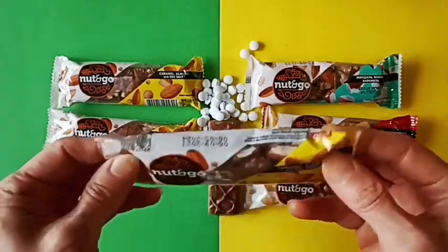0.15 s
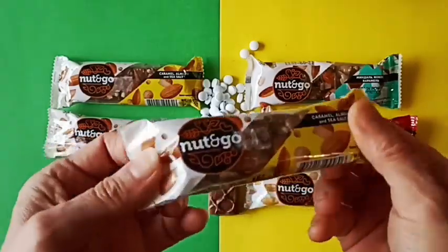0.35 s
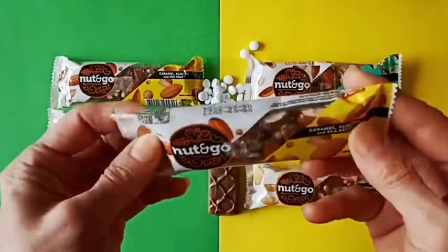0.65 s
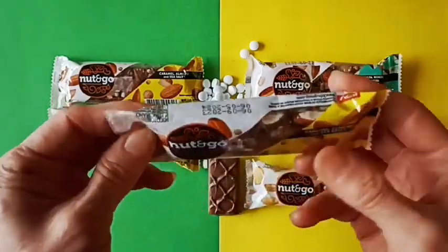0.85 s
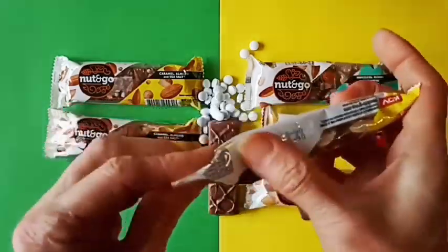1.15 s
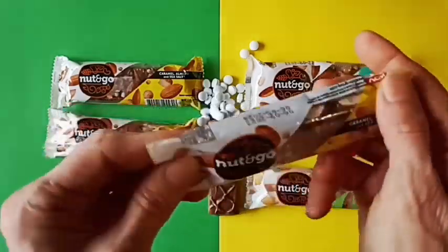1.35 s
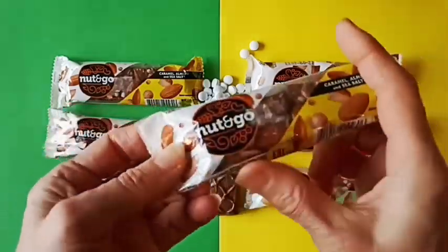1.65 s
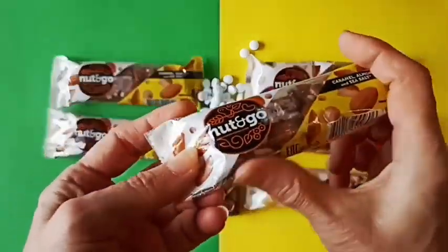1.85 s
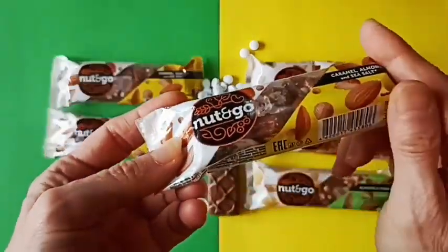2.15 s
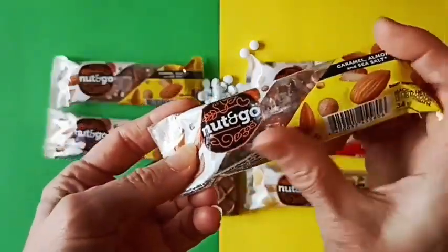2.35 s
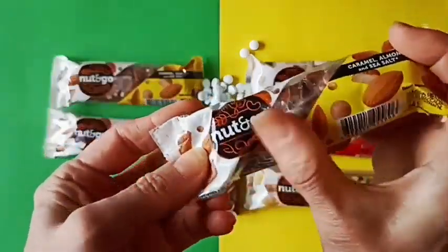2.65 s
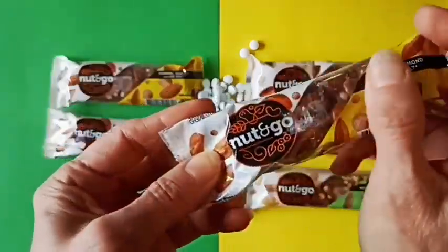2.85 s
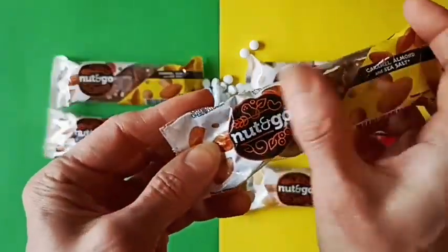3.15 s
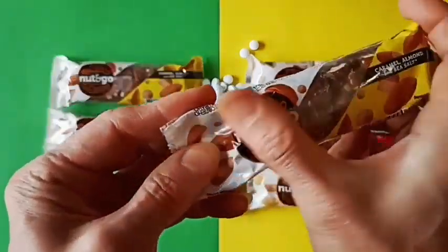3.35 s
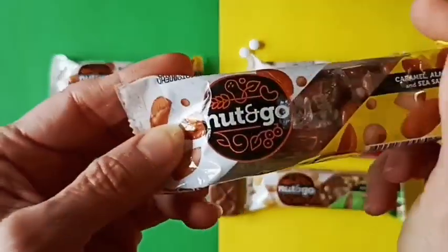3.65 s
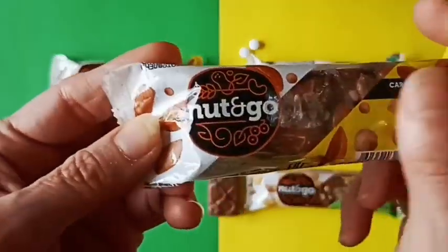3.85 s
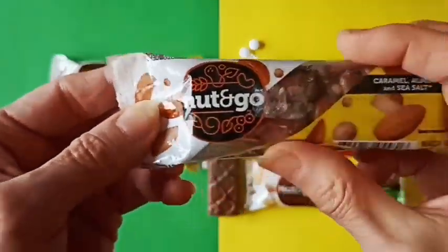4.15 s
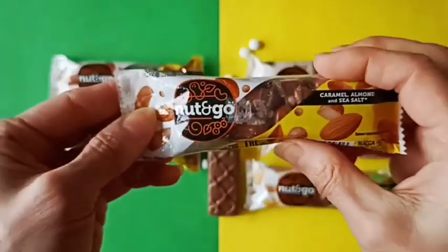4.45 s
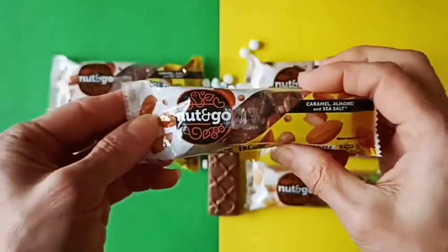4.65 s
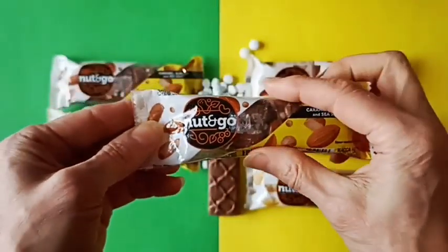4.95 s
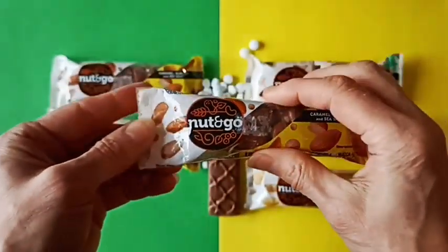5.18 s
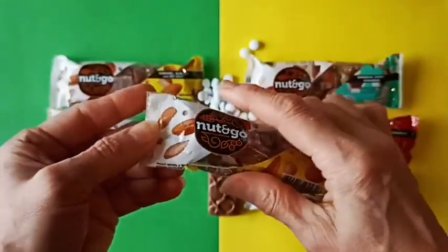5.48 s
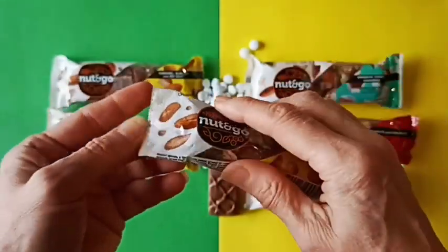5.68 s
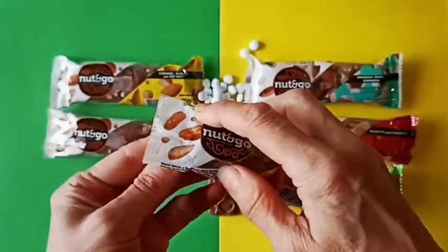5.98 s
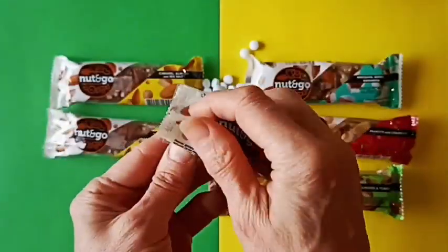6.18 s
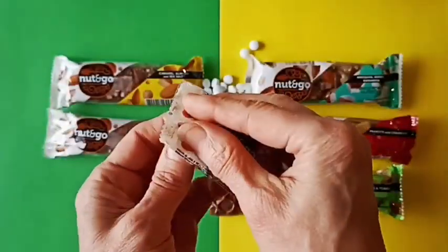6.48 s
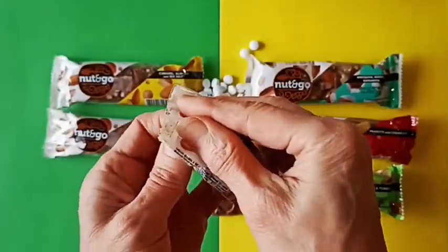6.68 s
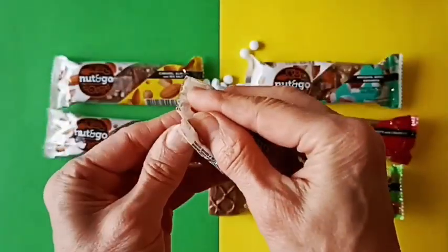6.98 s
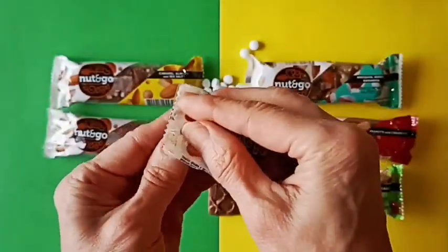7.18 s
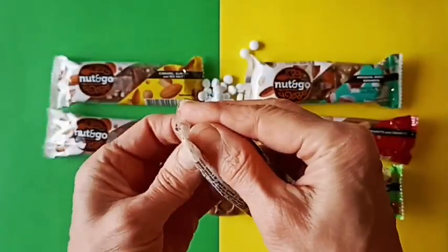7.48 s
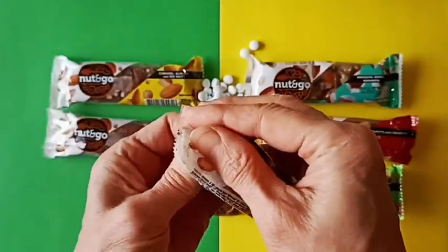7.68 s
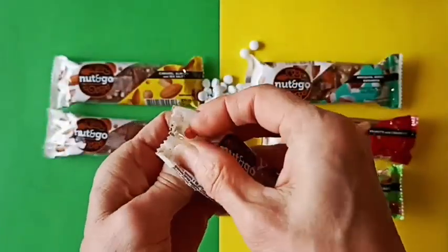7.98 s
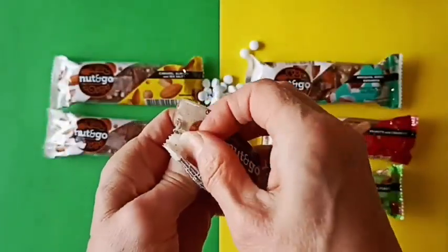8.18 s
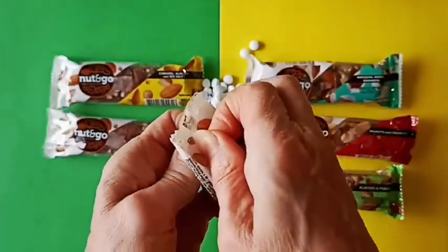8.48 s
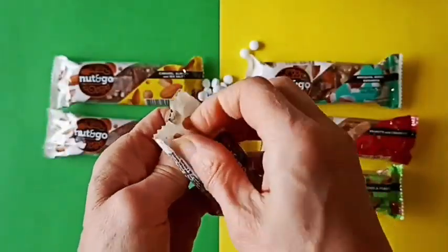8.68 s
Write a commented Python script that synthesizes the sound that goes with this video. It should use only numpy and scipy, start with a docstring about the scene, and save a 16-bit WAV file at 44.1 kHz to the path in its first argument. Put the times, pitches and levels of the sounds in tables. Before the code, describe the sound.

A candy bar in thin plastic film is handled very close to two microphones in a small, quiet room with a short, dry reflection. From 0 to 1 second, light snaps and short hissing rubs start up. From about 1.2 to 4.4 seconds the handling is fullest: firm finger slides with dense gritty crackle, bright irregular crease pops, differing slightly left and right, and brief hollow bends of the pouch. Dull soft fingertip knocks land near 1.4, 2.7, 3.2 to 3.3 and 3.7 seconds. Around 4.6 to 4.9 it falls almost silent, with just faint rustle. Crinkles return at 5, with a stronger snap near 5.5 and a flurry of short rubs to 6.2. From there to about 9 seconds, fingers pinch the stiff sealed end: quieter, sparse, thin, high ticks and tiny rubs, a slightly stronger snap near 8, and no obvious tear.

```python
"""Candy wrapper in two hands

Two hands turn a candy bar in its plastic wrapper close to a pair of microphones, then pinch and pull the sealed end.
Creases snap as short bursts ringing at the pitch of a facet; fingers slide with hiss and dense crackle;
the film settles with noise that trails each disturbance. Now and then the pouch bends through a narrow
resonance, or a fingertip lands on the bar as a dull knock. A small, quiet room adds one echo and a short tail.
"""
import sys
import numpy as np
from scipy import signal
from scipy.fft import rfft, irfft, next_fast_len
from scipy.io import wavfile
from scipy.ndimage import uniform_filter1d

SR = 44100
rng = np.random.default_rng(int(sys.argv[2]) if len(sys.argv) > 2 else 0)


def inscribe(sig):
    """Save sig as 16-bit PCM at rate SR to the path in sys.argv[1].

    A 1-D sig is mono; a 2-D sig holds one channel per row.
    Samples are clipped to [-1, 1] before scaling.
    """
    pcm = np.round(np.clip(np.atleast_2d(sig).T, -1, 1) * 32767)
    wavfile.write(sys.argv[1], SR, pcm.astype(np.int16))


N = 389403
TIME = np.arange(N) / SR

# Spectral shape of the still air of the room: (frequency [Hz], relative density [dB per Hz])
AIR_SPECTRUM = [(15, -28), (25, -23.5), (130, -4.5), (887, -17), (2760, -27.5), (11300, -75), (12500, -38),
                (16000, -69)]
# Tone of the film at each microphone: (frequency [Hz], left gain [dB], right gain [dB])
FILM_RESPONSE = [(96, -20.5, -21), (365, -3, -3.5), (1000.0, -3, -4), (2500.0, 0.5, 0.5), (2770, 3, 5.5),
                 (3570, 5.5, 6.5), (3710, -1.5, 0.5), (6200, 0.5, 4), (6760, -4, 1.5), (8350, -9, -0.5),
                 (11350, -3, -10), (11760, 4.5, -4), (15360, -4.5, -10.5), (16300, -28, -31)]
# The pouch bends with a hollow note; level before the film's tone:
# (time [s], length [s], level [dB], pitch [Hz])
POUCH_FLEXES = [(0.429, 0.055, -53, 395), (1.42, 0.081, -42.5, 1950), (2.817, 0.071, -43, 690),
                (5.766, 0.062, -49.5, 426), (6.13, .06, -48.5, 420), (8.024, 0.061, -49, 880)]
# Fingertips landing on the bar: (time [s], peak of the direct knock [dB], pitch [Hz])
BAR_TAPS = [(1.399, -36.5, 377), (2.71, -35.5, 380), (3.237, -33, 600), (3.285, -34, 583),
            (3.695, -31, 406)]
# The larger creases that buckle; energy before the facet rings:
# (time [s], burst energy [dB], facet pitch [Hz])
CREASE_SNAPS = [(0.1132, -13.5, 9900), (0.148, -12.5, 11900), (0.3012, -7, 1900), (0.3631, -6.5, 1400),
                (0.5735, -8.5, 5240), (0.6164, -11.5, 3320), (0.698, -9.5, 5250), (0.8124, -8.5, 2240),
                (0.8955, -11, 10900), (0.9483, -4, 3730), (0.9844, -8, 4670), (1.0731, -9.5, 8300),
                (1.121, -15, 8900), (1.276, -8, 6200), (1.4, -0.5, 1100), (1.4975, -5.5, 11900),
                (1.5642, 0.5, 3480), (1.699, -4, 3240), (1.7453, -6.5, 1590), (1.8073, -5.5, 13500),
                (1.856, -6.5, 3250), (1.9146, -10, 6500), (2.0156, -7.5, 3600), (2.0552, 1.5, 5250),
                (2.1257, 2.5, 6200), (2.2295, -11.5, 9450), (2.2531, -12.5, 2980), (2.3514, -6, 13000),
                (2.4867, -5, 6200), (2.7602, -1, 10800), (2.9077, 1.5, 10500), (2.9933, -6, 6860),
                (3.0364, -9.5, 1000), (3.2411, 5, 900), (3.2891, 2, 860), (3.372, -6.5, 2680),
                (3.419, -5, 6900), (3.6618, 0.5, 5470), (3.8884, 1, 2320), (3.9334, -8.5, 1280),
                (3.979, 1, 2620), (4.0557, -3, 1840), (4.1277, 1.5, 4130), (4.1987, -11, 4730),
                (4.3235, -8.5, 890), (4.3697, -5, 10200), (4.5415, -13, 10100), (4.6894, -26.5, 1100),
                (4.7528, -13, 3820), (4.826, -23.5, 900), (5.0092, -9.5, 5160), (5.1024, -15, 2900),
                (5.1723, -14.5, 9000), (5.2669, -10, 10300), (5.3234, -6.5, 900), (5.428, -10, 9050),
                (5.4906, -2.5, 2250), (6.2378, -11.5, 8260), (6.3579, -11.5, 8240), (6.4302, -13, 1670),
                (6.641, -13.5, 5140), (6.8371, -14.5, 6700), (6.9083, -7, 2500), (7.138, -10.5, 7500),
                (7.486, -11, 9000), (7.593, -12, 1380), (7.7213, -14.5, 2700), (7.7891, -17, 11200),
                (7.8767, -10, 9000), (7.9823, -5.5, 9000), (8.1464, -12.5, 9050), (8.2186, -21, 1390),
                (8.4075, -15.5, 12700), (8.6542, -11, 8150)]
# Fingers sliding on the film; level before the patch and the film add their tone:
# (time [s], length [s], level [dB])
FINGER_STROKES = [(-0.02, 0.092, -41.5), (0.206, 0.21, -37), (0.437, 0.058, -39), (0.615, 0.081, -39.5),
                  (0.732, 0.1, -47.5), (0.88, 0.1, -46.5), (1.164, 0.16, -37.5), (1.267, 0.24, -30),
                  (1.534, 0.22, -34), (1.915, 0.13, -32.5), (2.049, 0.15, -33), (2.287, 0.097, -34.5),
                  (2.367, 0.27, -37), (2.615, 0.095, -49.5), (2.672, 0.3, -35.5), (2.908, 0.16, -43.5),
                  (3.124, 0.17, -33.5), (3.372, 0.065, -44.5), (3.446, 0.31, -33.5), (3.655, 0.087, -36),
                  (3.73, 0.29, -38.5), (4.04, 0.12, -42), (4.174, 0.13, -35), (4.442, 0.12, -44.5),
                  (4.979, 0.052, -41.5), (5.048, 0.05, -44.5), (5.257, 0.11, -44), (5.379, 0.079, -38),
                  (5.465, 0.17, -41), (5.648, 0.049, -43), (5.764, 0.049, -41.5), (5.825, 0.16, -43),
                  (5.971, 0.08, -38.5), (6.059, 0.071, -37), (6.124, 0.072, -34), (6.289, 0.12, -45.5),
                  (6.469, 0.13, -47.5), (6.663, 0.087, -45), (7.119, 0.076, -41.5), (7.278, 0.032, -47),
                  (7.353, 0.048, -49), (7.438, 0.11, -44), (7.59, 0.039, -46), (7.723, 0.061, -44.5),
                  (7.86, 0.086, -47), (7.965, 0.15, -46.5), (8.385, 0.046, -49), (8.503, 0.066, -46.5),
                  (8.617, 0.074, -41.5), (8.77, 0.075, -46)]

AIR_DB = -65
ROOM_T60_S, ROOM_DB = 0.1, -12.5   # tail decay; tail level before it is dulled
CEILING_ECHO_S, CEILING_ECHO_DB = 0.0086, -13.5
CUTOFF_HZ = 16300
SPLIT_HZ = 1400   # above this the two microphones hear different waves
BAR_HZ, SEAL_HZ = 570, 7500   # pitch of the rubbed patch: backed by the bar, or the free sealed end
SEAL_S = 6.25   # the fingers have moved from the bar to the sealed end
HOLD_DB = -70   # dull rustle of the held film, before the grip wavers
HOLD_TICK_DB, HOLD_TICKS_PER_S = -66.5, 22   # stray creases ticking under the same grip
SETTLE_DB, SETTLE_S = -18.5, 0.05   # base level relative to the disturbance; time constant of its energy
FIRM_DB, EDGE_FOLLOWS = -40, 0.36   # level of a firm stroke; extra treble [dB] for each dB above it
FOLD_SHIFTS_PER_S = 16   # how often the fold that is giving way heads for a new size


def from_db(db):
    """Decibels to gain."""
    return 10 ** (np.asarray(db) / 20)


def rms_one(x):
    """Scale to unit rms."""
    return x / np.sqrt(np.mean(x ** 2) + 1e-20)


def cut(x, hz, kind, order=2):
    """Butterworth low-pass or high-pass."""
    return signal.sosfilt(signal.butter(order, hz, kind, fs=SR, output="sos"), x + 1e-18)


def drift(per_s):
    """Random wander of unit rms, ramping between per_s new values a second."""
    points = rng.standard_normal(int(N / SR * per_s) + 2)
    return rms_one(np.interp(TIME * per_s, np.arange(len(points)), points))


def colour(x, hz, db):
    """Causal (minimum-phase) filter with the given response; treble edges are rounded so they do not ring."""
    size = 2 * next_fast_len(N // 2 + 4096)
    grid = np.maximum(np.arange(size // 2 + 1) * SR / size, 1)
    response = np.interp(np.log(grid), np.log(hz), db)
    smooth = uniform_filter1d(response, size // 200)
    response = np.where(grid > 2000, smooth, response)
    # folding the cepstrum onto positive times makes the filter causal
    cepstrum = irfft(np.log(from_db(response)))
    cepstrum[1:size // 2] *= 2
    cepstrum[size // 2 + 1:] = 0
    return irfft(rfft(x, size) * np.exp(rfft(cepstrum)), size)[:N]


def two_ports(shared, apart):
    """Both microphones hear the same lows; the film throws its highs differently to each."""
    split_highs = cut(apart, SPLIT_HZ, "high", order=1)
    return np.array([shared, cut(shared, SPLIT_HZ, "low", order=1) + split_highs])


def facet(x, hz, q, crack):
    """A patch of film rings broadly at its own pitch, over a share of plain crack."""
    b, a = signal.iirpeak(hz, q, fs=SR)
    return signal.lfilter(b, a, x + 1e-18) + crack * x


def folded(x, depth=0.4, path_s=(0.0002, 0.0007)):
    """A nearby fold reflects the highs, so every event gets peaks and dips of its own."""
    lag = int(rng.uniform(*path_s) * SR)
    echo = np.pad(x, ((0, 0), (lag, 0)))[:, :x.shape[1]]
    echo = rng.choice([-1, 1]) * cut(echo, SPLIT_HZ, "high")
    return (x + depth * echo) / np.hypot(1, depth)


def stroke(s, length, skew, fullness):
    """The samples of one movement and its speed, which swells and falls away."""
    span = slice(max(int(s * SR), 0), max(int((s + length) * SR), 0) + 2)
    travel = np.clip((TIME[span] - s) / length, 0, 1)
    return span, np.abs(np.sin(np.pi * travel ** skew)) ** fullness


def crackle(per_s, spread_db, q=2.4, crack=0.38, flutter_s=0.0013, wander=1.8, scatter=1.9, count=10, size=128):
    """Tiny creases give way at random; their pitches cluster round that of the fold, which keeps shifting."""
    born = rng.random(N) < per_s / SR
    strength = from_db(spread_db * np.minimum(rng.exponential(1, N), 2))
    clicks = born * strength * rng.choice([-1, 1], N)
    # deal each click to one of the pitches
    fold = count / 2 + wander * drift(FOLD_SHIFTS_PER_S) + scatter * rng.standard_normal(N)
    dealt = np.clip(fold, 0, count - 1).astype(int)
    fade = np.exp(-np.arange(size) / SR / flutter_s)
    out = np.zeros((2, N))
    for k, hz in enumerate(np.geomspace(1400, 13000, count)):
        burst = rng.standard_normal((2, size)) * fade
        tick = rms_one(facet(rng.permutation(two_ports(*burst)), hz, q, crack))
        out += signal.oaconvolve((clicks * (dealt == k))[None], tick, axes=1)[:, :N]
    return rms_one(out)


def air(shared=0.52):
    """Faint steady room noise, partly common to both microphones."""
    noise = rng.standard_normal((2, N)) + shared * cut(rng.standard_normal(N), 1500, "low")
    hz, db = np.transpose(AIR_SPECTRUM)
    return from_db(AIR_DB) * rms_one(np.array([colour(side, hz, db) for side in noise]))


def room(x, dull_hz=7000, onset_s=0.0061, echo_fade_s=0.0024):
    """One early, diffuse echo from the ceiling, and a short, duller tail."""
    age = np.arange(SR // 2) / SR
    tail = rng.standard_normal((2, len(age))) * from_db(-60 * age / ROOM_T60_S)
    tail = tail * (1 - np.exp(-(age / onset_s) ** 2))
    tail = cut(tail / np.sqrt(np.sum(tail ** 2) / 2), dull_hz, "low", order=1)
    late = np.maximum(age - CEILING_ECHO_S, 0)
    echo = rng.standard_normal(tail.shape) * (late > 0) * np.exp(-late / echo_fade_s)
    echo = echo / np.sqrt(np.sum(echo ** 2) / 2)
    answer = from_db(ROOM_DB) * tail + from_db(CEILING_ECHO_DB) * echo
    return signal.fftconvolve(x, answer, axes=1)[:, :N]


def holding(rustle_hz=2600, q=1.0, crack=0.42, waver_db=3.0, pinch_db=2.0):
    """The held film rustles dully and ticks with the wavering grip, more so once it is pinched."""
    grip = from_db(waver_db * drift(14) + pinch_db * (TIME > SEAL_S))
    rustle = rms_one(facet(two_ports(*rng.standard_normal((2, N))), rustle_hz, q, crack))
    ticks = crackle(per_s=HOLD_TICKS_PER_S, spread_db=2.5)
    return grip * (from_db(HOLD_DB) * rustle + from_db(HOLD_TICK_DB) * ticks)


def settling(handled, hiss_db=-2.5):
    """Disturbed film goes on rustling and ticking as it relaxes."""
    keep = np.exp(-1 / (SETTLE_S * SR))
    power = np.mean(handled ** 2, axis=0) + 1e-18
    unrest = np.sqrt(signal.lfilter([1 - keep], [1, -keep], power))
    hiss = two_ports(*rng.standard_normal((2, N)))
    ticks = crackle(per_s=90, spread_db=4.5)
    return from_db(SETTLE_DB) * unrest * (ticks + from_db(hiss_db) * hiss)


def flexing(q=2.4, skew=0.81, fullness=1.5):
    """A bending panel of the pouch creaks: noise passes twice through one resonance."""
    creak = two_ports(*rng.standard_normal((2, N)))
    out = np.zeros((2, N))
    for s, length, db, hz in POUCH_FLEXES:
        span, speed = stroke(s, length, skew, fullness)
        note = facet(facet(creak[:, span], hz, q, 0), hz, q, 0)
        out[:, span] += from_db(db) * speed * rms_one(note)
    return out


def taps(fade_s=0.006, width=1.66, size=2048):
    """A fingertip meets the soft bar under the film: a dull, quickly damped knock."""
    out = np.zeros(N)
    for s, db, hz in BAR_TAPS:
        push = rng.standard_normal(size) * np.exp(-np.arange(size) / SR / fade_s)
        knock = cut(push, hz / width, "high", order=4)
        knock = cut(knock, hz * width, "low", order=4)
        start = int(s * SR)
        out[start:start + size] += from_db(db) * knock / np.abs(knock).max()
    return out


def pinched(film):
    """Closing fingers damp the pouch's ring; the hollow of the hands and the stiff, toothed seam sound instead."""
    closed = np.clip((TIME - SEAL_S) * 2, 0, 1)   # closes over half a second
    # pouch, hollow, seam, teeth: (pitch [Hz], gain once closed [dB], q)
    changes = [(3350, -5.5, 4), (1900, 2.0, 2.5), (7900, 3.0, 5), (13000, 2.0, 2)]
    return film + closed * sum((from_db(db) - 1) * facet(film, hz, q, 0) for hz, db, q in changes)


def snaps(flutter_s=0.0026, kick=3.3, q=1.75, crack=0.86, swell_s=0.0006, size=512):
    """Each crease snap swells in briefly, kicks and flutters for a few milliseconds."""
    age = np.arange(size) / SR
    envelope = np.minimum(age / swell_s, 1) ** 2 * np.exp(-age / flutter_s)
    out = np.zeros((2, N + size))
    for s, db, hz in CREASE_SNAPS:
        burst = rng.standard_normal((2, size)) * envelope
        burst[:, int(2 * swell_s * SR)] += kick * rng.choice([-1, 1], 2)
        pair = two_ports(rms_one(burst[0]), rms_one(burst[1])) / np.sqrt(size)
        pair = rng.permutation(pair)   # either microphone may be the nearer one
        start = int(s * SR)
        out[:, start:start + size] += from_db(db) * folded(facet(pair, hz, q, crack))
    return out[:, :N]


def sliding(hiss_db=-5.0, crackle_db=-3.0, judder_db=3.0, waver_db=2.5, q=1.07, plain=0.96, skew=0.64,
            fullness=0.88, bar_db=-7.0, seal_db=-3.5, edge_hz=8000, edge_db=-12.5, crease_db=-5.5):
    """Each stroke catches quickly, hisses with fine grain and lets go; the firmer it is, the brighter."""
    hiss = two_ports(*rng.standard_normal((2, N))) * rms_one(from_db(judder_db * drift(350)))
    grain = crackle(per_s=450, spread_db=7.5, q=4.1)
    friction = from_db(hiss_db) * hiss + from_db(crackle_db) * grain
    friction = friction * from_db(waver_db * drift(140))   # the finger's pressure is uneven
    lone_creases = crackle(per_s=45, spread_db=4.5, q=2.3, flutter_s=0.00056)
    friction = friction + from_db(crease_db) * lone_creases
    out = np.zeros((2, N))
    for s, length, db in FINGER_STROKES:
        span, speed = stroke(s, length, skew, fullness)
        rub = rms_one(rng.permutation(friction[:, span])) * speed
        hz, patch_db = (BAR_HZ, bar_db) if s < SEAL_S else (SEAL_HZ, seal_db)
        patch = from_db(patch_db) * facet(rub, hz, q, 0)
        firmness_db = EDGE_FOLLOWS * (db - FIRM_DB)
        edge = from_db(edge_db + firmness_db) * cut(rub, edge_hz, "high", order=1)
        out[:, span] += from_db(db) * folded(plain * rub + patch + edge, depth=0.27)
    return out


def scene():
    """The wrapper and the fingertips, in the room."""
    handled = snaps() + sliding()
    wrapper = pinched(handled + settling(handled) + holding()) + flexing()
    hz, *ports_db = np.transpose(FILM_RESPONSE)
    direct = np.array([colour(side, hz, db) for side, db in zip(wrapper, ports_db)])
    direct = direct + taps()
    return direct + room(direct) + air()


def record(dry):
    """The top is cut steeply."""
    return signal.sosfilt(signal.ellip(10, 0.2, 70, CUTOFF_HZ, fs=SR, output="sos"), dry)


dry = scene()
out = record(dry)
inscribe(out)
```